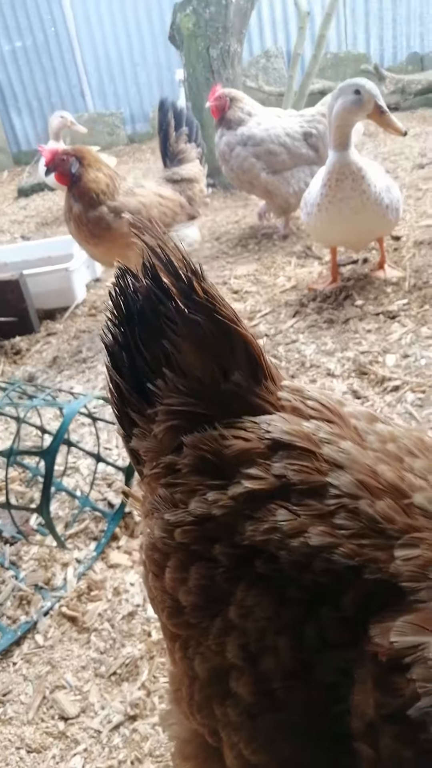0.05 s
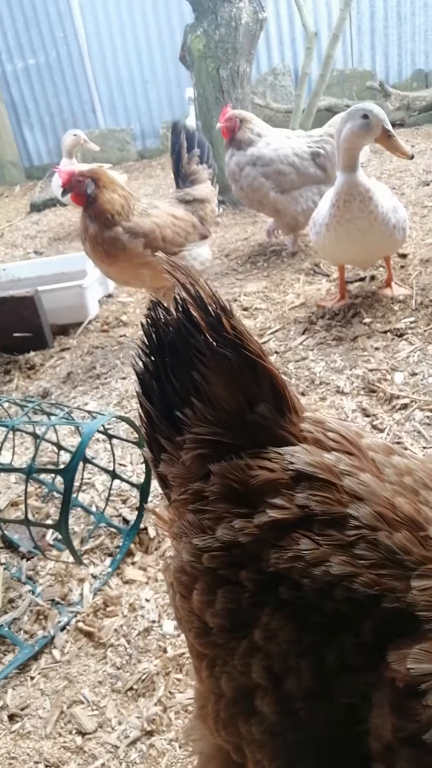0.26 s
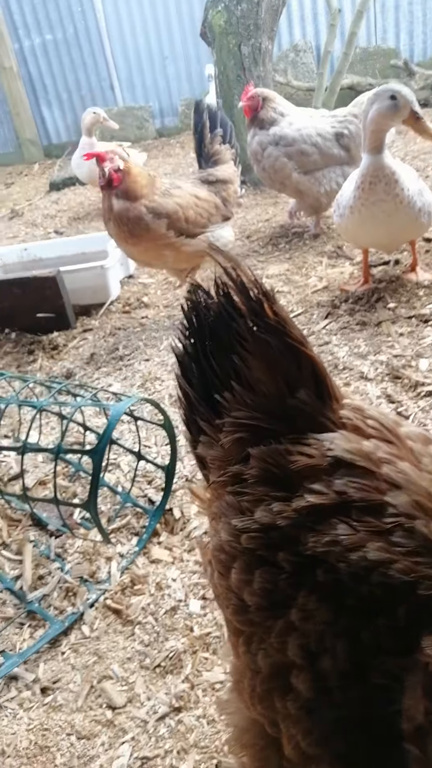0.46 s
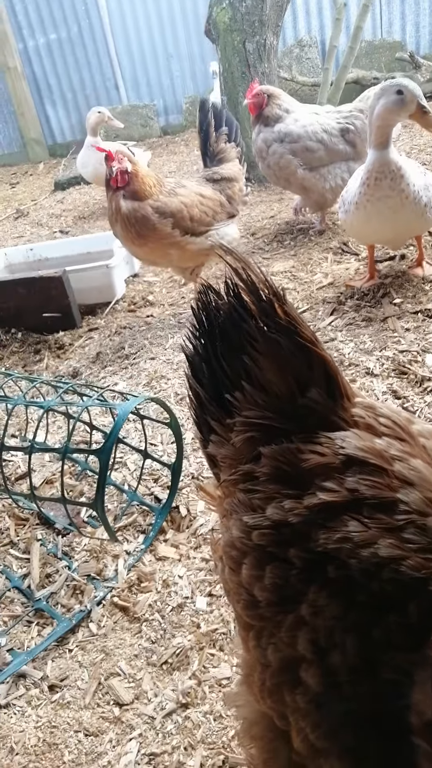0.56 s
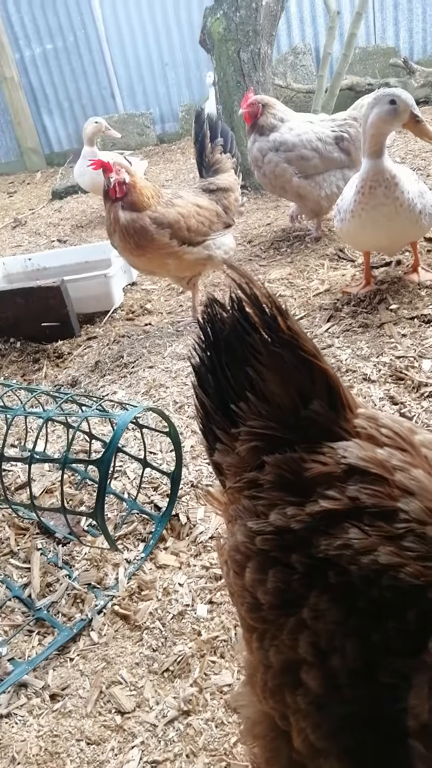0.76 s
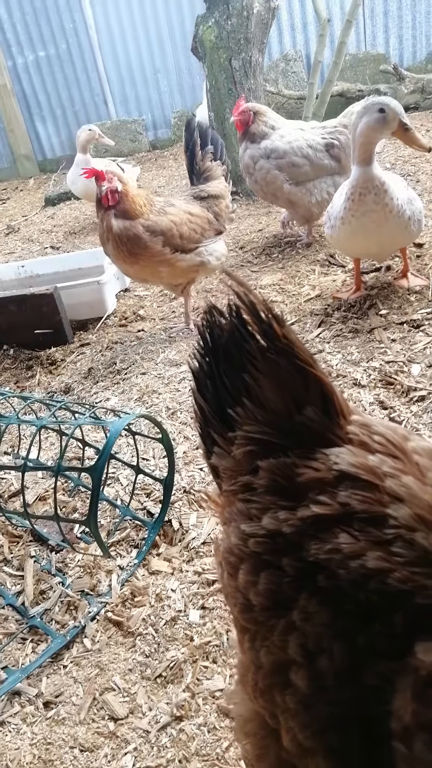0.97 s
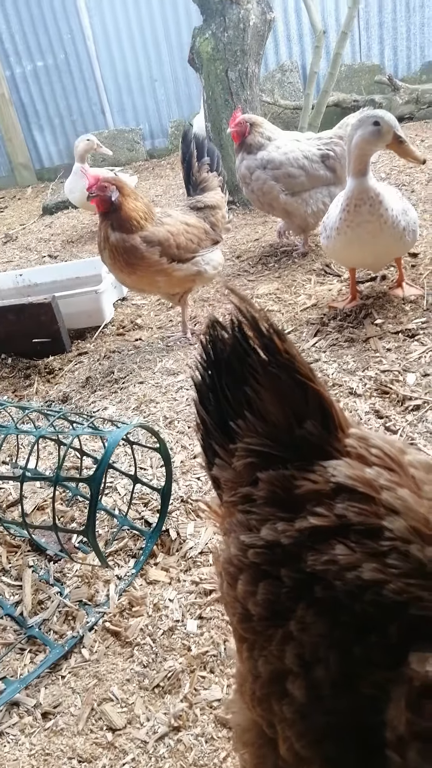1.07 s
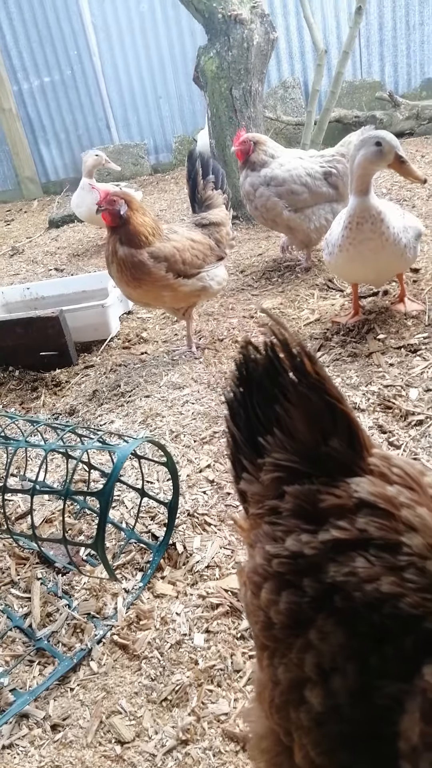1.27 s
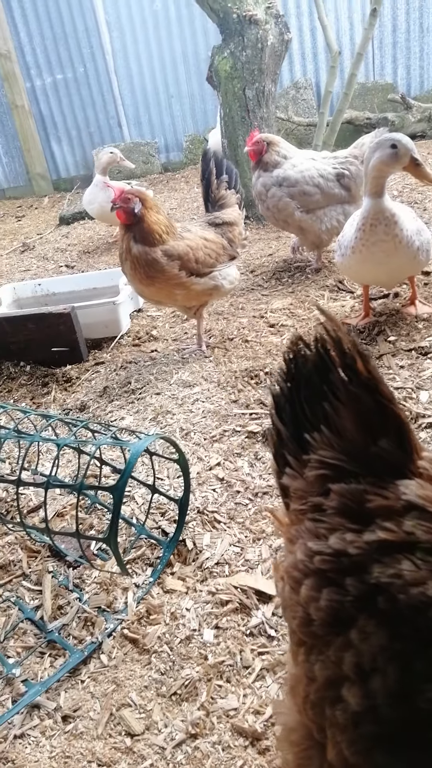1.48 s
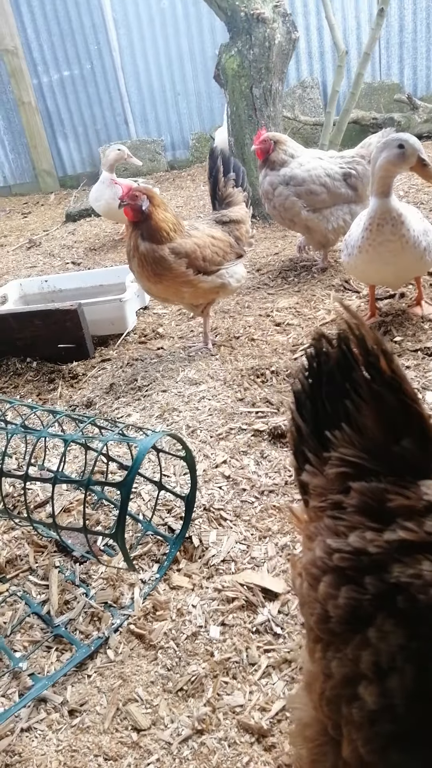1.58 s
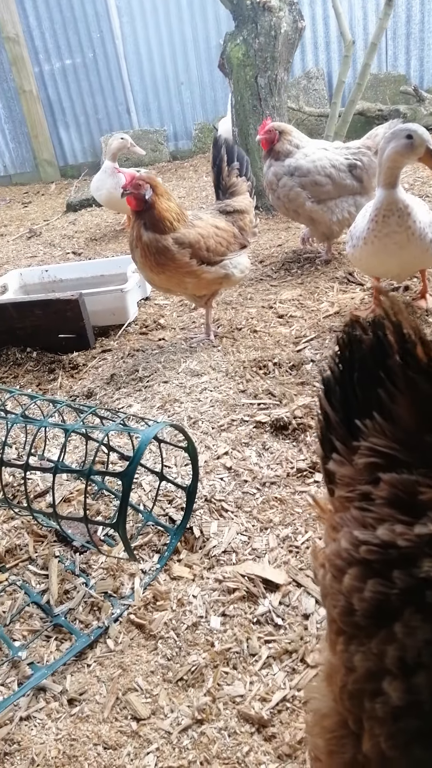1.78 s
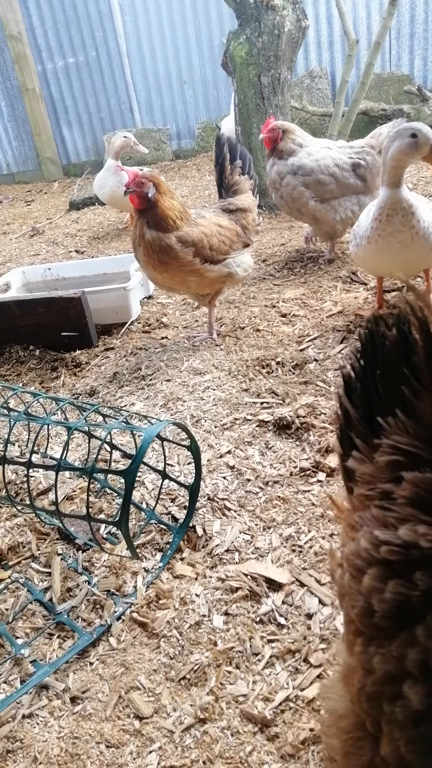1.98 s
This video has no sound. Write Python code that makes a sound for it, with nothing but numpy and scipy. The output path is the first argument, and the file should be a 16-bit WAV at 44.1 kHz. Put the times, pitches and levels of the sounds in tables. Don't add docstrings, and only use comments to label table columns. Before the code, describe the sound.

Loud raspy hen squawk with breaking pitch, then lower rougher calls, faint clucks and distant traffic rumble.

```python
import sys
import numpy as np
from scipy import signal
from scipy.fft import rfft, irfft, next_fast_len
from scipy.io import wavfile
from scipy.ndimage import map_coordinates

SR = 44100
rng = np.random.default_rng(int(sys.argv[2]) if len(sys.argv) > 2 else 0)


def persist_wave(psi):
    counts = np.round(np.clip(psi, -1, 1) * 32767).astype(np.int16)
    wavfile.write(sys.argv[1], SR, np.atleast_2d(counts).T)


def magnitude_from_level(level_db):
    exponent = np.asarray(level_db, float) / 20
    return 10 ** exponent


N = 90052
T = np.arange(N) / SR

# t/s, f/Hz
FIRST_PITCH = [(0, 628), (.05, 632), (.13, 636), (.3, 633), (.5, 633), (.545, 618), (.6, 620), (.615, 591),
               (.7, 588)]
# t/s, level/dB, noise share/0-1
FIRST_EFFORT = [(0, -26, 0.01), (.028, -30.5, 0.44), (.04, -24, 0.21), (.125, -30, 0.19), (.29, -29, 0.22),
                (.46, -27.5, 0.24), (.485, -28, 0.19), (.6, -27.5, 0.19), (.64, -42.5, 0.16)]
# start t/s, length/s, top f/Hz, level/dB, half-pitch level/dB
BURSTS = [
    (0.034, 0.041, 680.5, -27, -21),
    (0.148, 0.052, 689.6, -24, -4.5),
    (.225, 0.066, 701.8, -23.5, -3.5),
    (0.311, 0.051, 673.3, -26, -9.5),
    (0.353, 0.06, 699, -24.5, -3),
    (0.488, 0.055, 690.3, -25.5, -6.5),
]
# f/Hz, level/dB
FIRST_THROAT = [(330, -28.5), (630, -28), (830, -33.5), (1290, 0), (1650, -16), (2600, -12.5),
                (4300, -37.5), (13000, -50)]
# f/Hz, width/Hz, level/dB
FIRST_TRACT = [(497, 61, -7.5), (743, 55, -2.5), (1272.6, 32, 3.5), (2089, 63, -9), (3300, 200, -3.5),
               (4536, 250, -10.5), (6060, 2170, 11), (8300, 220, -13), (11100, 420, 2.5)]
# f/Hz, density/dB per Hz
RUMBLE_SPECTRUM = [(15, -54.5), (25, -3), (88, -12.5), (308, -31), (333, -27), (525, -37.5), (723, -35.5),
                   (1840, -36), (14800, -56)]
# f/Hz, correlation/1
RUMBLE_LIKENESS = [(60, 1), (150, 0.96), (400, 0.13), (2000, 0.22)]
# f/Hz, t60/s
PEN_T60 = [(500, 0.32), (1200, 0.23), (2500, 0.26), (6000, .22), (12000, 0.045)]
# f/Hz, level/dB
PEN_COLOUR = [(300, 0.5), (1200, 1.5), (5000, 3.5), (12000, 9)]
# f/Hz, level/dB
SIDES = [(600, -13), (1200, 5), (2500, 10.5), (5000, 10), (9000, 8), (13000, -23)]
# t/s, level/dB, f/Hz
CLUCKS = [
    (.618, -38, 1700),
    (.775, -54, 2200),
    (.84, -42, 1850),
    (.911, -39, 1780),
]
# start t/s, length/s, level/dB, from f/Hz, to f/Hz
WHEEZES = [
    (.66, 0.076, -53, 2920, 2630),
    (.765, 0.066, -56, 2074, 2406),
    (0.792, 0.093, -49.5, 3770, 2336),
    (0.876, 0.091, -51.5, 3523, 3300),
    (0.964, 0.088, -44, 3907, 3600),
    (1.842, .06, -64, 2074, 2830),
    (1.902, 0.063, -61, 2515, 2190),
]
# t/s, f/Hz
LATER_PITCH = [(.93, 545), (1.03, 575), (1.12, 586), (1.26, 584), (1.32, 575), (1.44, 560), (1.5, 560),
               (1.545, 585), (1.6, 575), (1.91, 600), (1.93, 582), (1.97, 585), (2.04, 590)]
# t/s, level/dB, noise share/0-1
LATER_EFFORT = [(.912, -64, .5), (.96, -31.5, 0.56), (1.05, -31.5, 0.93), (1.13, -34, .3),
                (1.18, -32.5, 0.69), (1.23, -35, 0.24), (1.42, -35, 0.6), (1.462, -49.5, 0.9),
                (1.484, -46, 0.4), (1.487, -32, 0.46), (1.545, -33, 0.43), (1.585, -45, 0.6),
                (1.605, -87.5, 0.7), (1.9, -93, 0.15), (1.914, -40, 0.63), (1.965, -46.5, 0.23),
                (1.985, -38.5, 0.26), (2.04, -41.5, 0.4)]
# t/s, level above the main resonance/dB
BEAK_OPENING = [(.93, -14), (1.0, -3), (1.06, 0), (1.47, 0), (1.49, -4), (1.52, 0), (1.9, -18), (1.935, -7),
                (2.0, 0)]
# f/Hz, level/dB
LATER_THROAT = [(400, -38), (600, -22.5), (900, -15), (1200, 0), (1550, -14.5), (2500, -8.5), (3600, -28),
                (13000, -53.5)]
# f/Hz, width/Hz, level/dB
LATER_TRACT = [(1003, 107, 1), (2306, 52, 2), (3260, 130, -6), (3876, 356, -14.5), (5840, 340, 14.5),
               (7310, 640, 10), (8080, 320, -17), (11680, 1000, 8)]
# t/s, peak level/dB
TICKS = [
    (.9403, -50.5),
    (1.5925, -47.5),
]


def unit(x):
    return x / np.sqrt(np.mean(x ** 2) + 1e-20)


def along(points, hz):
    f_hz, value = np.transpose(points)
    return np.interp(np.log(hz + 1), np.log(f_hz + 1), value)


def curves(rows):
    t_s, *columns = np.transpose(rows)
    return [np.interp(T, t_s, column) for column in columns]


def wobble(rate_hz):
    knots = rng.standard_normal(int(N * rate_hz / SR) + 4)
    return map_coordinates(knots, [np.arange(N) * rate_hz / SR])


def filtered(x, response):
    m = next_fast_len(N + SR // 2)
    return irfft(rfft(x, m) * response(np.fft.rfftfreq(m, 1 / SR)), m)[..., :N]


def voice(pitch_hz, share, half_db, throat, tract, jitter, shimmer_db):
    breath_part, flutter_db = .45, 12
    share = np.clip(share, 0, 1)
    drift = jitter * share * wobble(150) + 0.001745 * wobble(25.14) + 0.0017 * wobble(300)
    cycles = np.cumsum(pitch_hz * (1 + drift)) / SR

    k = np.arange(1, 51)[:, None]
    line_gain = np.where(k % 2, magnitude_from_level(half_db), 1)
    tone = unit((line_gain * np.cos(np.pi * k * cycles + 0.36 * k ** 2)).sum(0))
    tone = tone * magnitude_from_level(shimmer_db * wobble(40.09) + flutter_db * share * wobble(200))
    tone = tone / magnitude_from_level(flutter_db ** 2 * share ** 2 / 5.6)
    breath = unit(rng.standard_normal(N) * (1 + np.cos(2 * np.pi * cycles)) ** 2)
    source = np.sqrt(1 - breath_part * share) * tone + np.sqrt(breath_part * share) * breath

    def throat_gain(hz):
        peaks_db = sum(db * np.exp(-((hz - centre_hz) / width_hz) ** 2) for centre_hz, width_hz, db in tract)
        return magnitude_from_level(along(throat, hz) + peaks_db)

    return unit(filtered(source, throat_gain))


def first_call():
    from_hz, peak_place, edge_power, duck, onset_db = 650, .4, .4, .3, 25
    (pitch_hz,), (level_db, share) = curves(FIRST_PITCH), curves(FIRST_EFFORT)
    level_db = level_db - 900 * np.clip(T - FIRST_EFFORT[-1][0], 0, 1)
    steady = magnitude_from_level(level_db) * voice(pitch_hz, share, -40, FIRST_THROAT, FIRST_TRACT, .05, 1.5)

    high_hz, gain, half_db = np.full(N, float(from_hz)), np.zeros(N), np.full(N, -20.)
    for start_s, length_s, top_hz, burst_db, sub_db in BURSTS:
        u = (T - start_s) / length_s
        hump = np.sin(np.pi / 2 * np.interp(u, [0, peak_place, 1], [0, 1, 0]))
        high_hz = high_hz + (top_hz - from_hz) * hump
        gain = gain + magnitude_from_level(burst_db) * hump ** edge_power
        half_db[hump > 0] = (sub_db - onset_db * (1 - hump ** 2))[hump > 0]
        steady = steady * (1 - duck * hump)
    return steady + gain * voice(high_hz, .17, half_db, FIRST_THROAT, FIRST_TRACT, .12, 2)


def rumble():
    def angle(hz):
        return np.arccos(np.clip(along(RUMBLE_LIKENESS, hz), -1, 1)) / 2

    def mid_side_gain(hz):
        return magnitude_from_level(along(RUMBLE_SPECTRUM, hz)) * [np.cos(angle(hz)), np.sin(angle(hz))]

    pair = rng.standard_normal((2, N)) * magnitude_from_level(0.4 * wobble(5.9))
    mid, side = filtered(pair, mid_side_gain)
    return magnitude_from_level(-56.5) * unit(np.array([mid + side, mid - side]))


def pen(x):
    hz, t, z = signal.stft(rng.standard_normal((2, SR // 2)), SR, nperseg=256)
    decay = magnitude_from_level(-60 * t / along(PEN_T60, hz)[:, None])
    tail = signal.istft(z * decay, SR, nperseg=256)[1]
    late = np.pad(x, (200, 0))[None]
    return signal.fftconvolve(late, tail / np.linalg.norm(tail[0]), axes=1)[:, :N]


def clucks():
    t60_s, attack_s = .035, .001
    out, t = np.zeros(N + SR), T[:SR // 10]
    for start_s, level_db, hz in CLUCKS:
        ring = sum(g * np.sin(2 * np.pi * ratio * hz * t) for ratio, g in ((1, 1), (.88, .5), (.7, .3)))
        envelope = magnitude_from_level(level_db - 60 * t / t60_s) * (1 - np.exp(-t / attack_s))
        out[round(start_s * SR):][:len(t)] += envelope * ring
    return out[:N]


def wheezes():
    width_hz, upper_ratio, upper_db = 620, 1.55, -9
    out = np.zeros(N)
    for start_s, length_s, level_db, from_hz, to_hz in WHEEZES:
        u = np.clip((T - start_s) / length_s, 0, 1)
        cycles = np.cumsum(from_hz + (to_hz - from_hz) * u) / SR
        envelope = magnitude_from_level(level_db) * np.abs(np.sin(np.pi * u)) ** 0.67
        for ratio, gain in ((1, 1), (upper_ratio, magnitude_from_level(upper_db))):
            noise = rng.standard_normal((2, N))
            a, b = filtered(noise, lambda hz: 1 / (1 + (2 * hz / width_hz) ** 2))
            phase = 2 * np.pi * ratio * cycles
            out += envelope * gain * unit(a * np.cos(phase) + b * np.sin(phase))
    return out


def later_calls():
    half_mean_db, half_swing_db, half_pulse_hz, beak_hz = -10.5, 11, 22.69, 1500
    (pitch_hz,), (level_db, share) = curves(LATER_PITCH), curves(LATER_EFFORT)
    (open_db,) = curves(BEAK_OPENING)
    half_db = half_mean_db + half_swing_db * np.sin(2 * np.pi * half_pulse_hz * T + 0.88 * wobble(9.3))
    call = voice(pitch_hz, share, half_db, LATER_THROAT, LATER_TRACT, 0.058, 2.1)
    low = filtered(call, lambda hz: 1 / (1 + (hz / beak_hz) ** 8))
    return magnitude_from_level(level_db) * (low + magnitude_from_level(open_db) * (call - low))


def litter():
    hz, t60_s = 11000, 0.0012
    out, t = np.zeros(N + SR), T[:SR // 100]
    for start_s, peak_db in TICKS:
        tick = magnitude_from_level(peak_db + 3 - 60 * t / t60_s) * np.sin(2 * np.pi * hz * t)
        out[round(start_s * SR):][:len(t)] += tick
    return out[:N] * magnitude_from_level([[-2], [2]])


def scene():
    low_hz, high_hz, lag_s, pen_db = 204, 13160, -0.0006126, -1.5
    ear = np.array([[1], [-1]])

    def band(hz):
        return 1 / (1 + (low_hz / (hz + 1)) ** 4) / (1 + (hz / high_hz) ** 24)

    def to_ears(hz):
        return magnitude_from_level(ear * along(SIDES, hz) / 2) * np.exp(-1j * np.pi * ear * lag_s * hz)

    birds = filtered(first_call() + clucks() + wheezes() + later_calls(), band)
    direct = filtered(birds, to_ears)
    echoes = magnitude_from_level(pen_db) * pen(filtered(birds, lambda hz: magnitude_from_level(along(PEN_COLOUR, hz))))
    return direct + echoes + litter() + rumble()


def low_pass(x):
    return signal.sosfilt(signal.butter(12, 14940, fs=SR, output="sos"), x)


def record(dry):
    return low_pass(dry)


dry = scene()
out = record(dry)
persist_wave(out)
```